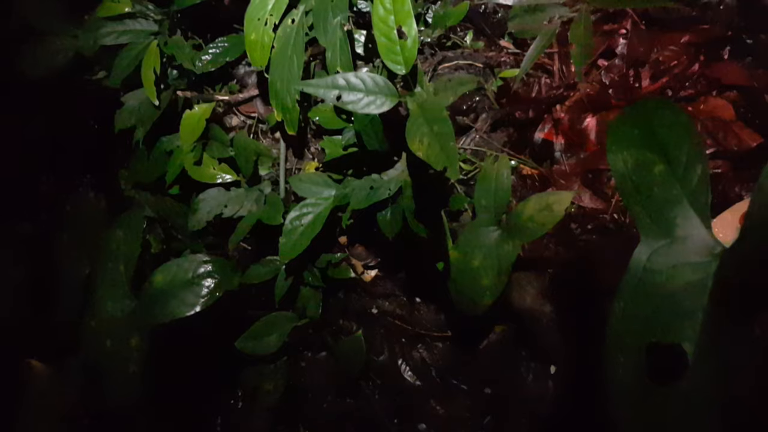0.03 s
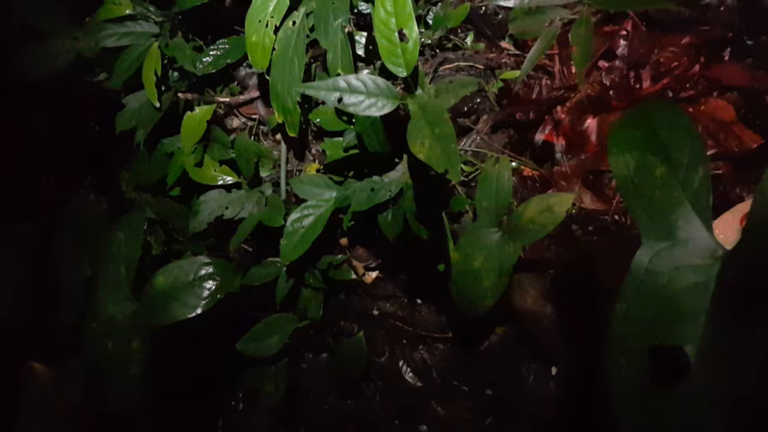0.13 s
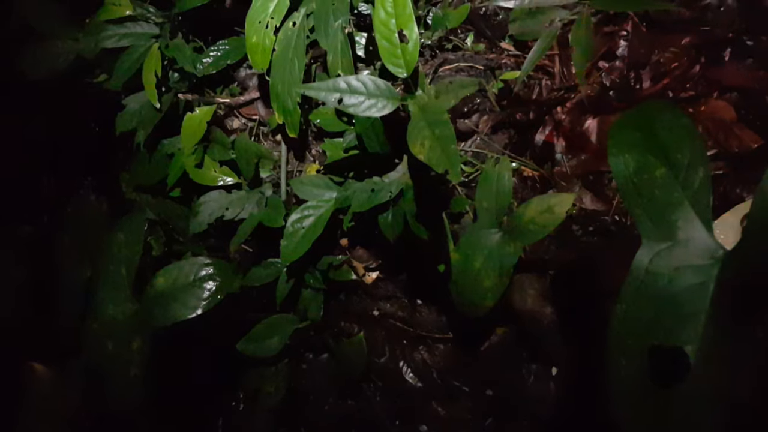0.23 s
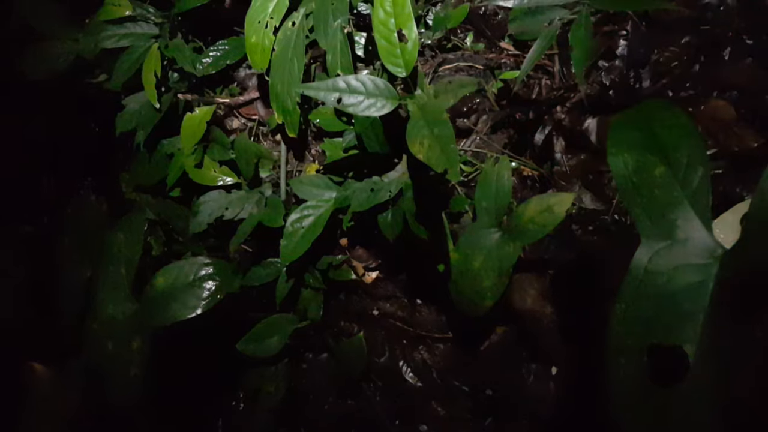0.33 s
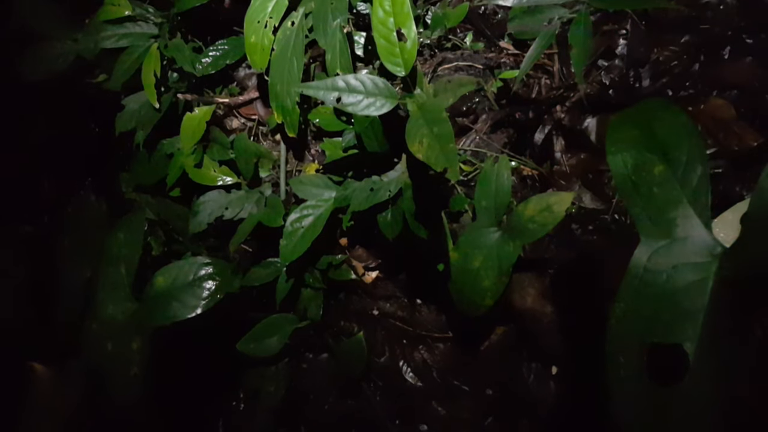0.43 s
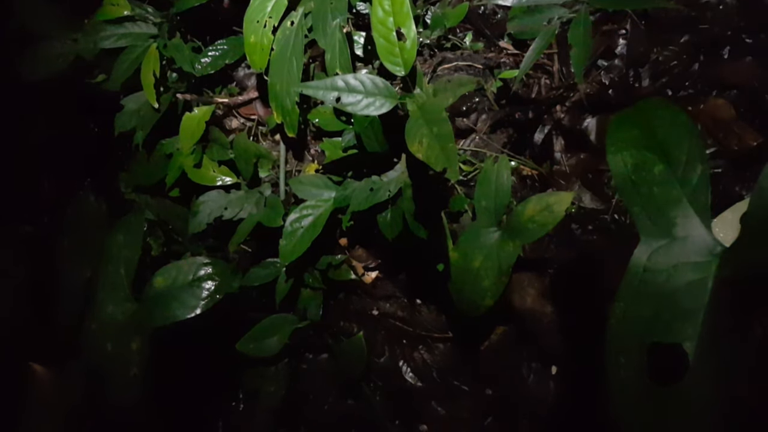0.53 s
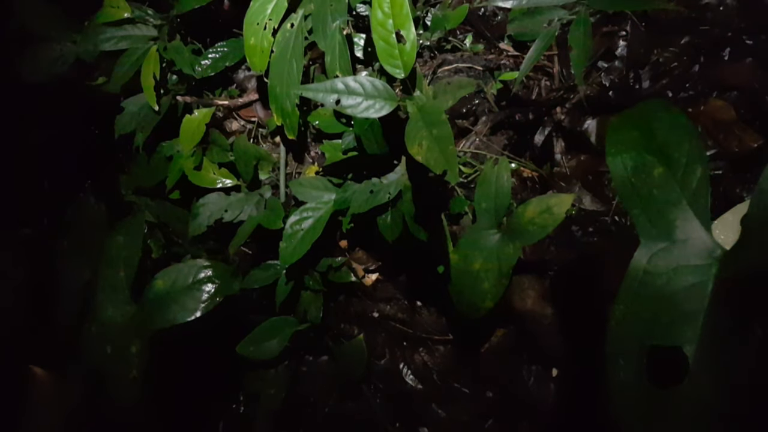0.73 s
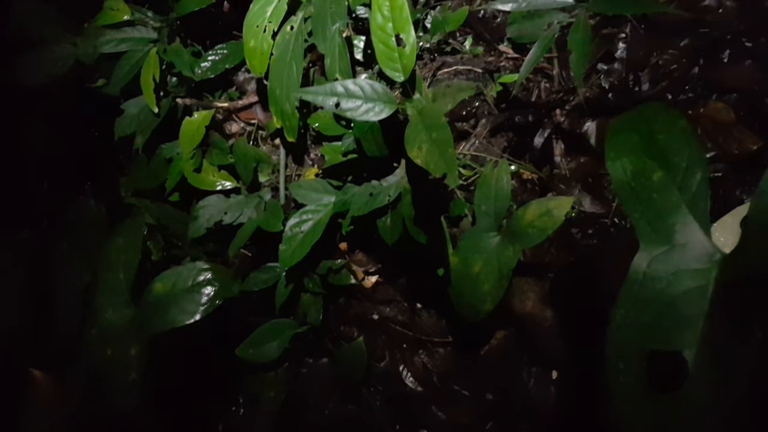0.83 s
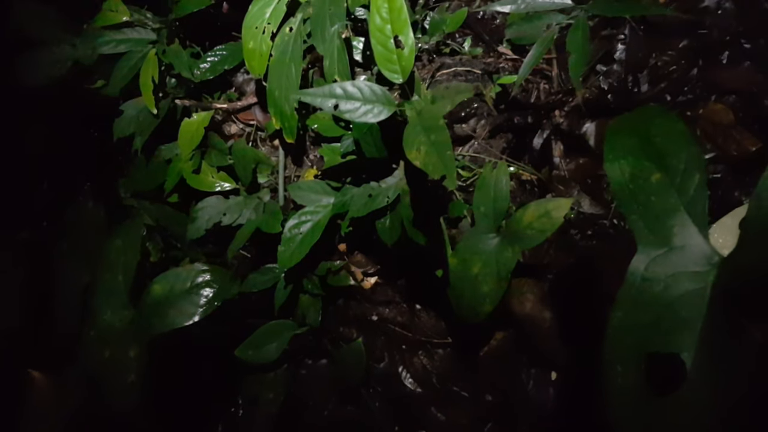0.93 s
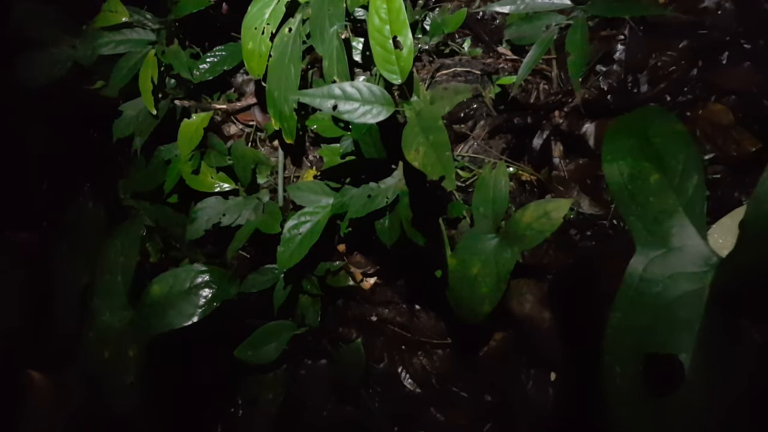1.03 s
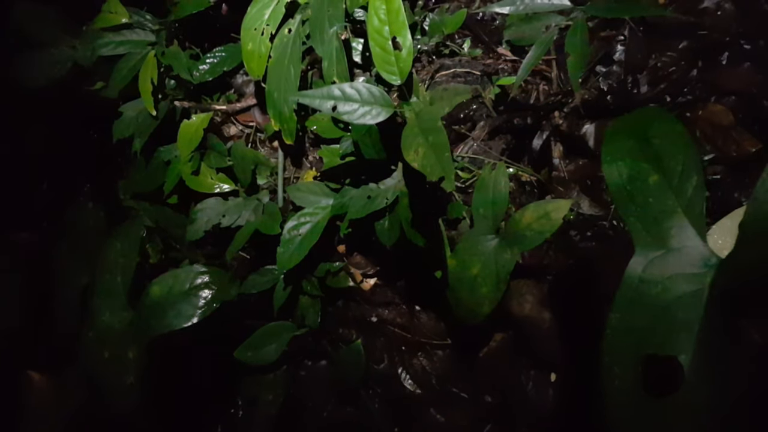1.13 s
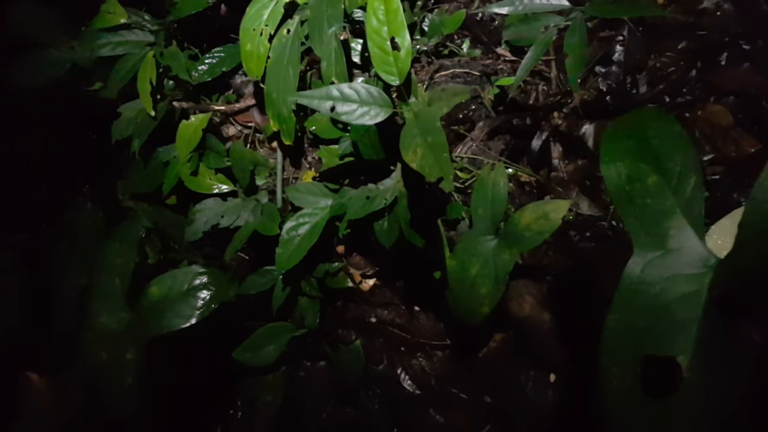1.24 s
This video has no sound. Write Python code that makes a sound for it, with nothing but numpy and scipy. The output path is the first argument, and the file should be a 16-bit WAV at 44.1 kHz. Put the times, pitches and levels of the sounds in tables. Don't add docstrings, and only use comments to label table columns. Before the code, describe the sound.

A tree frog close on the left whoops at about 0.16, 0.5 and 0.85 seconds: short hollow tones sliding quickly upward, then dropping off, the first loudest, the last slightly lower and softer. Trunk echoes and a faint leafy tail follow. A duller distant frog answers near 1.2. After brief opening silence, high crickets and katydids drone throughout, some coming and going, over soft hiss, rustle and faint low hum.

```python
import sys
import numpy as np
from scipy import signal
from scipy.fft import rfft, irfft
from scipy.io import wavfile
from scipy.ndimage import uniform_filter1d, minimum_filter1d

SR = 44100
rng = np.random.default_rng(int(sys.argv[2]) if len(sys.argv) > 2 else 0)


def dump_mix(stems):
    frames = np.atleast_2d(stems).T
    limited = np.clip(frames, -1, 1)
    pcm = np.round(limited * 32767).astype(np.int16)
    wavfile.write(sys.argv[1], SR, pcm)


def rack_gain(trim_db):
    fader = np.asarray(trim_db, float)
    return 10 ** (fader / 20)


N = 57330
PAD = SR // 2


def evened(x):
    return x / np.sqrt(np.mean(x ** 2) + 1e-20)


def read(points, hz):
    f, value = np.transpose(points)
    return np.interp(np.log(hz + 1), np.log(f + 1), value)


def add(mix, s, sound):
    part = mix[:, round(s * SR) + PAD:][:, :sound.shape[1]]
    part += sound[:, :part.shape[1]]


def sides(pan_db):
    return rack_gain(np.array([[pan_db / 2], [-pan_db / 2]])) / np.cosh(pan_db * np.log(10) / 40)


def slow(rate):
    t = np.arange(0, N + 64, 64) / SR
    wander = 0
    for f in np.geomspace(rate / 10, rate, 12):
        wander = wander + np.sin(2 * np.pi * (f * t + rng.random())) / np.sqrt(f)
    return np.interp(np.arange(N) / SR, t, evened(wander))


def coloured(points, n):
    hz = np.fft.rfftfreq(n, 1 / SR)
    inside = (hz > points[0][0] / 2) & (hz < points[-1][0] * 1.05)
    spectrum = rfft(rng.standard_normal((2, n))) * rack_gain(read(points, hz)) * inside
    return evened(irfft(spectrum, n))


# (frequency [Hz], level per Hz [dB])
HISS_TONE = [(25, -19), (60, -4), (150, -15.5), (330, -23.5), (3200, -36), (4600, -14), (8000, -8),
             (15500, -42.5)]
# (frequency [Hz], likeness [0-1])
HISS_LIKENESS = [(60, 0.66), (250, 0.085), (12000, .05)]


def hiss():
    frames, hz = N // 256 + 5, np.fft.rfftfreq(1024, 1 / SR)
    a, b, c, d, patches = rng.standard_normal((frames, 513, 5)).T
    patches = uniform_filter1d(patches, size=8, axis=0)
    patches = evened(uniform_filter1d(patches, size=14, axis=1))
    same = read(HISS_LIKENESS, hz)[:, None]
    left = a + 1j * b
    right = same * left + np.sqrt(1 - same ** 2) * (c + 1j * d)
    z = np.array([left, right]) * rack_gain(read(HISS_TONE, hz)[:, None] + 1.7 * patches)
    noise = signal.istft(z, nperseg=1024, noverlap=768)[1][:, :N]
    return rack_gain(-60) * sides(.5) * evened(noise)


def wing(hz, width, rate, same):
    sag_per_s, chirp_depth, waver_db = .0062, 0.26, 1.5
    noise = rng.standard_normal((4, N + 8000))
    r = np.exp(-np.pi * width / SR)
    fuzz = signal.lfilter([1], np.convolve([1, -r], [1, -r]), noise[:2] + 1j * noise[2:])[:, 8000:]
    fuzz = np.array([fuzz[0], same * fuzz[0] + np.sqrt(1 - same ** 2) * fuzz[1]])
    fuzz = fuzz / np.sqrt(abs(fuzz) + 0.19 * abs(fuzz).mean())
    t = np.arange(N) / SR
    tone = evened((fuzz * np.exp(2j * np.pi * hz * (t - sag_per_s * t ** 2 / 2))).real)
    throb = 1 + chirp_depth * (rate > 0) * np.sin(2 * np.pi * (rate * t + rng.random()))
    return tone * throb * rack_gain(waver_db * slow(5))


def hum():
    return rack_gain(-74) * wing(72.8, 8, 0, 1.0)


# (time [s], level [dB])
RUSTLE_LEVEL = [
    (.07, -60.5),
    (.15, -68.5),
    (.2, -68.5),
    (.3, -65),
    (.45, -64),
    (.7, -65),
    (.9, -67),
    (1.0, -65),
    (1.3, -70.5),
]
# (frequency [Hz], level per Hz [dB])
RUSTLE_TONE = [(7000, -29.5), (9500, -9), (13000, -10), (15200, -12.5)]


def leaves():
    level_db = np.interp(np.arange(N) / SR, *np.transpose(RUSTLE_LEVEL))
    return rack_gain(level_db + 1.5 * slow(30)) * sides(5) * coloured(RUSTLE_TONE, N)


SINGER_HZ = [4010, 4372, 4468, 4574, 4652, 4716, 4756, 4938, 4560, 5305, 5800, 7180, 7400, 8490, 10500]
# (width [Hz], level [dB], left over right [dB], chirp rate [per s]); no throb below zero
SINGERS = [(40, -90, -4.5, -2.5), (14.15, -57.5, 6, -3), (10, -58, -3.5, 2.5), (8.5, -48.5, 5.5, 1),
           (12, -59, 9, -3), (8, -54, -6, -1.5), (8.1, -53, 14.5, 1), (8, -58, -0.5, -3.5),
           (328, -51, -1.5, 53.5), (45, -65.5, -6.5, -10.5), (400, -65, 2, -5), (220.24, -58.5, 6, 77),
           (150, -60.5, 5, 7.5), (120, -66, 19, -2), (500, -74.5, 10.5, 1.5)]


def steady_singers():
    out = np.zeros((2, N))
    for hz, (width, db, pan_db, rate) in zip(SINGER_HZ, SINGERS):
        out += rack_gain(db) * sides(pan_db) * wing(hz, width, rate, 0.21)
    return out


BOUT_HZ = [8030, 8135, 6660, 6680, 8900, 8960, 8960]
# (width [Hz], level [dB], start [s], end [s])
BOUTS = [
    (45.86, -57, 0.35, 0.97),
    (50, -54, 0.3, .91),
    (35, -60, 0.017, .2),
    (35, -63.5, 0.33, 0.99),
    (200, -62.5, 0.0183, 0.55),
    (150, -62, 0.75, .95),
    (202, -60.5, 1.09, 1.218),
]


def singers_in_bouts():
    edge_s, t = 0.014, np.arange(N) / SR
    out = np.zeros((2, N))
    for hz, (width, db, start, end) in zip(BOUT_HZ, BOUTS):
        on = 1 / (1 + np.exp(-np.minimum(t - start, end - t) / edge_s * 2))
        out += rack_gain(db) * on * sides(11) * wing(hz, width, 64, 0.21)
    return out


# (multiple of pitch, level [dB], share of throat level, share of sac level,
# left over right [dB], left lead [rad])
PARTIALS = [(1, 6, 0.9926, 0.2742, 3.5, 0.31), (2, 3.5, 0.053, 0.9184, 5.5, 0.522),
            (3, -2.5, 0.8192, 0, 5.5, -0.99), (4, -15, 0.634, 0.35, 7.5, -1.3),
            (5, -24, 0.626, 0.098, 3, 0.87), (6, -1, 0.564, 0, 6.5, -1.1), (7, -24, 0.312, 1.306, 2, 0.38),
            (8, -42, 0.61, 0.48, 6, .2)]
# (multiple of pitch, pitch [Hz], width [Hz], what remains [0-1])
CANCEL = [(3, 485.7, 40, 0), (2, 578.9, 35, .65), (3, 670, 13, 0.7), (1, 625, 12, 0.7), (3, 740.7, 14, 0.3),
          (4, 740, 9.3, 0.4), (4, 669.6, 35, 0.25), (4, 744, 7.7, 1), (5, 535, 27, .05), (5, 460, 54, .15),
          (5, 640, 65, 0), (5, 700, 25, 0.45), (6, 614, 142.4, 0.06), (6, 491.4, 294.3, 0),
          (6, 390, 110, 0.05), (7, 640, 64, 0.2), (8, 690, 59, 0.1), (1, 601, 49, 0.7), (7, 715, 4.7, 0),
          (2, 706, 16, 0.8)]


def partials(hz, turns, throat, sac, tilt_db, breath):
    out = np.zeros((2, len(hz)))
    for k, db, by_throat, by_sac, pan_db, lead in PARTIALS:
        level_db = db + by_throat * throat + by_sac * sac + tilt_db * max(k - 2, 0)
        gain = rack_gain(level_db) * np.sqrt(2)
        for multiple, at_hz, width, rest in CANCEL:
            if multiple == k:
                gain = gain * (1 - (1 - rest) * np.exp(-((hz - at_hz) / width) ** 2))
        phase = k * turns + 2 * np.pi * rng.random() + np.array([[lead], [0]])
        out += sides(pan_db) * gain * (1 + rack_gain(-45) * breath) * np.sin(phase)
    return out


# (frequency [Hz], level per Hz [dB])
KNEE_RASP = [(600, -14), (1500, -4), (3000, -8), (4800, -4.5), (6500, -30)]
# (frequency [Hz], level per Hz [dB])
DROP_RASP = [(500, -28.5), (900, -17), (1350, 7), (2000, -6.5), (2800, -18.5), (4400, -13.5), (6000, -34.5)]
KNEE_S = 0.043


def rasps(t, turns, sac, drop_s):
    knee = rack_gain(-33) * np.exp(-((t - KNEE_S) / 0.015) ** 2)
    drop = rack_gain(-36) * np.exp(-((t - drop_s - .001) / 0.013) ** 2)
    flutter = 1 + np.cos(turns)
    out = drop * sides(4.6) * coloured(DROP_RASP, len(t))
    return out + rack_gain(sac) * knee * flutter * sides(6.5) * coloured(KNEE_RASP, len(t))


def whistle(t, drift):
    start_hz, fall_hz_per_s, width_hz = 12100, 28000, 200
    u = t - .072
    wobble = 2 * np.pi * np.cumsum(width_hz * drift) / SR
    tone = np.sin(2 * np.pi * (start_hz * u - fall_hz_per_s * u ** 2 / 2) + wobble)
    return rack_gain(-57.5) * np.exp(-(u / .015) ** 2) * tone


# (frequency [Hz], level per Hz [dB])
PUFF_TONE = [(90, 1), (180, 1), (280, -12.5)]


def puff(t):
    return rack_gain(-71) * np.exp(-((t - .03) / .03) ** 2) * coloured(PUFF_TONE, len(t))[0]


def whoop(stretch, pitch, level_db, shape, tilt_db=0, near=1):
    s, hz, throat, sac = np.transpose(shape)
    s = np.minimum(s, KNEE_S) + stretch * np.maximum(s - KNEE_S, 0)
    t = np.arange(0, s[-1], 1 / SR)

    def smooth(v):
        return uniform_filter1d(np.interp(t, s, v), size=200, mode="nearest")

    hz, throat, sac = smooth(hz), smooth(throat), smooth(sac)
    turns = 2 * np.pi * np.cumsum(pitch * hz) / SR
    breath_width_hz = 200
    noise = rng.standard_normal((3, len(t)))
    breath = evened(signal.lfilter([1], [1, -np.exp(-np.pi * breath_width_hz / SR)], noise))
    voice = partials(hz, turns, throat, sac, tilt_db, breath[:2])
    voice += near * (rasps(t, turns, sac, s[-2]) + whistle(t, breath[2]))
    fade = np.clip(np.minimum(t / .009, (s[-1] - t) / .014), 0, 1)
    edge = np.sin(np.pi / 2 * fade) ** 2
    b, a = signal.butter(2, 280 / SR * 2, "high")
    return signal.lfilter(b, a, rack_gain(level_db) * voice * edge) + near * puff(t) * edge


# (time [s], pitch [Hz], throat level [dB], sac level [dB])
FAR_SHAPE = [
    (0, 452, -34.5, -43),
    (.014, 505.6, -29.5, -35.5),
    (0.038, 618, -25.5, -17),
    (0.044, 670.4, -25.5, -21.5),
    (0.074, 732.4, -29, -18.5),
    (0.091, 733.3, -42.5, -12),
    (0.097, 628.4, -15.5, -18.5),
    (0.106, 560, -36, -39.5),
]


def far_frog():
    far = np.zeros((2, N + PAD))
    call = whoop(0.77, 0.976, -26.5, FAR_SHAPE, -8.5, 0)
    add(far, 1.194, sides(0) * call.mean(0))
    t60_s = .25
    smear = rng.standard_normal((2, 8000)) * rack_gain(-60 * np.arange(8000) / SR / t60_s)
    smear /= np.linalg.norm(smear[0])
    far = far + rack_gain(-5) * signal.fftconvolve(far, smear, axes=1)[:, :N + PAD]
    return far[:, PAD:]


# (frequency [Hz], time to fall 60 dB [s])
FOREST_RING = [(400, 1.9), (1400, 0.818), (3000, 3.9), (8000, 0.87)]
# (frequency [Hz], level [dB])
FOREST_TONE = [(300, -9), (800, -5), (1150, -9), (1450, -1), (2200, -3), (5000, -0.5)]
# (delay [s], left level [dB], right level [dB])
TRUNKS = [
    (.0031, -36.5, -29),
    (.0052, -30, -35),
    (.0085, -29.5, -31.5),
    (.0128, -27, -27),
    (.0171, -32.5, -36),
    (.024, -28, -34),
    (.033, -41, -43),
    (.046, -34, -26),
    (.049, -46.5, -34.5),
]


def forest(x):
    taps = np.zeros((2, SR))
    at = np.arange(0, SR - 20, 20) + rng.integers(0, 20, (2, SR // 20 - 1))
    np.put_along_axis(taps, at, rng.choice([-1., 1.], at.shape), 1)
    hz, t, z = signal.stft(taps, SR, nperseg=256)
    level_db = -60 * t / read(FOREST_RING, hz)[:, None] + read(FOREST_TONE, hz)[:, None]
    tail = signal.istft(z * rack_gain(level_db), SR, nperseg=256)[1]
    start_s = 0.0089
    tail *= np.clip(np.arange(tail.shape[1]) / SR / start_s - 1, 0, 1)
    tail *= rack_gain(-29) / np.linalg.norm(tail[0])
    for s, left_db, right_db in TRUNKS:
        tail[:, round(s * SR)] += rack_gain(np.array([left_db, right_db]))
    return signal.fftconvolve(x, tail, axes=1)[:, :x.shape[1]]


# (time [s], stretch after the knee, pitch factor, level [dB])
WHOOPS = [
    (0.164, 0.9908, 1.0071, -1.5),
    (.5, 0.918, 1.0029, -2.5),
    (.851, 0.9155, 0.992, -3),
]
# (time [s], pitch [Hz], throat level [dB], sac level [dB])
SHAPE = [
    (0, 362, -53.5, -48.5),
    (.015, 417.8, -33.5, -38),
    (.035, 482.6, -25, -26.5),
    (.058, 612.3, -32.5, -8),
    (.08, 662.1, -30.5, -7.5),
    (.126, 734, -30.5, -9),
    (.139, 737.3, -32.5, -11.5),
    (.148, 638.5, -32, -29.5),
    (.17, 493, -41.5, -44),
]


def near_frog():
    near = np.zeros((2, N + PAD))
    add(near, -0.22, whoop(0.989, 0.9984, 2, SHAPE))
    for start, stretch, pitch, level_db in WHOOPS:
        add(near, start, whoop(stretch, pitch, level_db, SHAPE))
    return (near + forest(near))[:, PAD:]


def scene():
    background = hiss() + hum() + leaves()
    insects = steady_singers() + singers_in_bouts()
    return background + insects + far_frog() + near_frog()


def band_limit(x):
    return signal.sosfilt(signal.butter(12, 15760, fs=SR, output="sos"), x)


def record(dry):
    start_s, ceiling = 0.0668, .99
    on = np.clip((np.arange(N) / SR - start_s) / .005, 0, 1)
    room = np.minimum(ceiling / (abs(dry).max(0) + 1e-9), 1)
    gain = uniform_filter1d(minimum_filter1d(room, size=801), size=401)
    return band_limit(dry * gain * on)


dry = scene()
out = record(dry)
dump_mix(out)
```